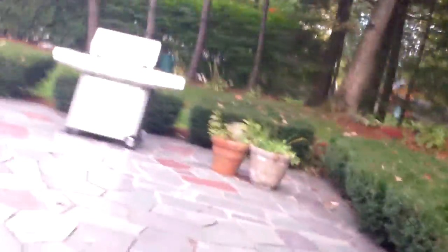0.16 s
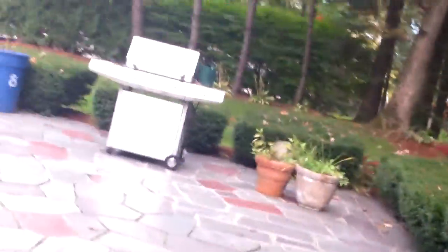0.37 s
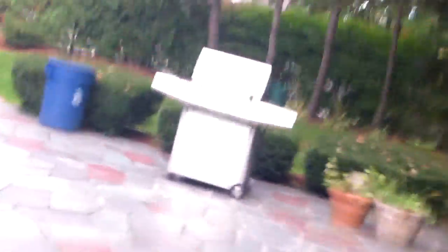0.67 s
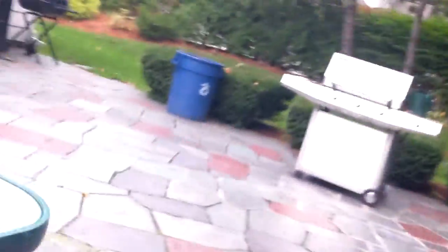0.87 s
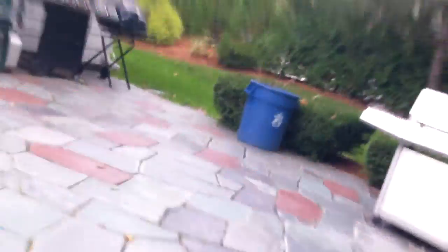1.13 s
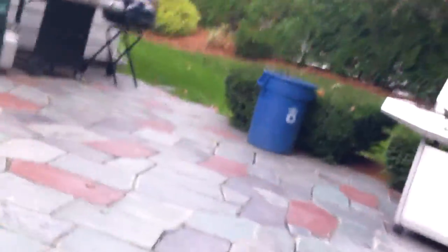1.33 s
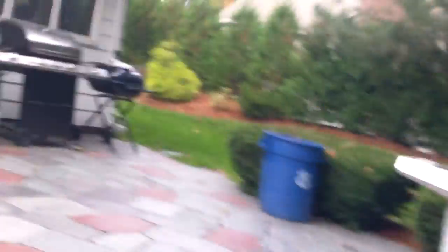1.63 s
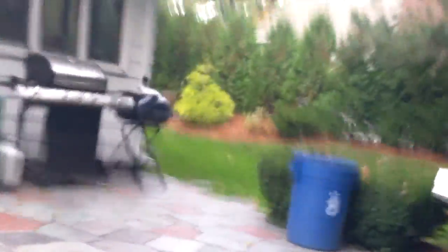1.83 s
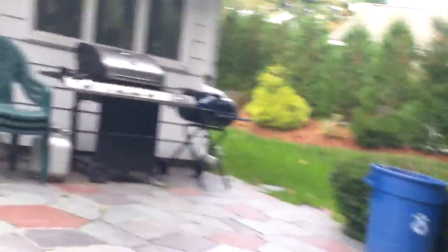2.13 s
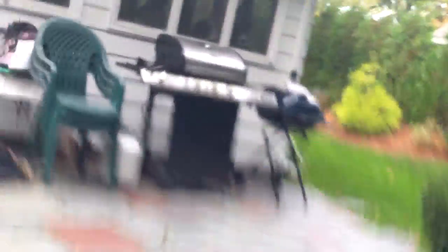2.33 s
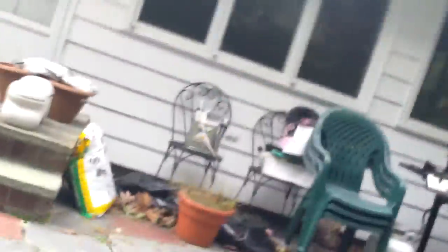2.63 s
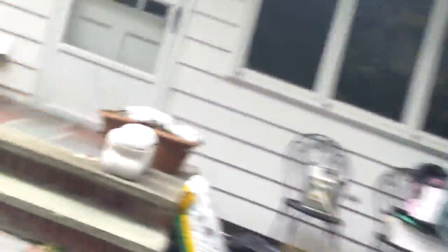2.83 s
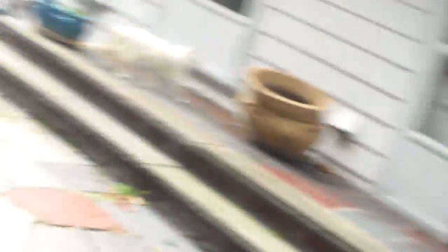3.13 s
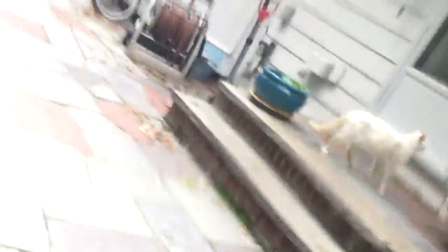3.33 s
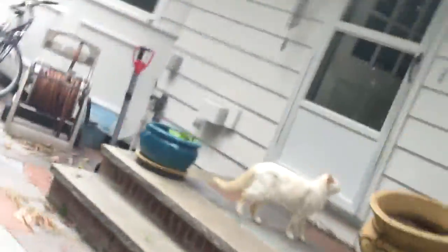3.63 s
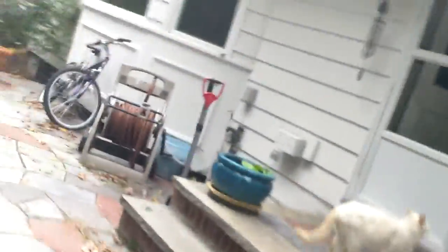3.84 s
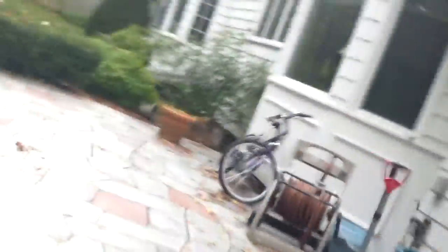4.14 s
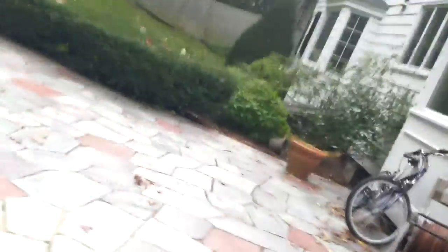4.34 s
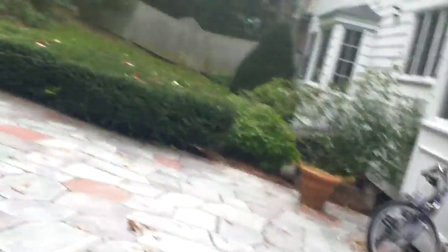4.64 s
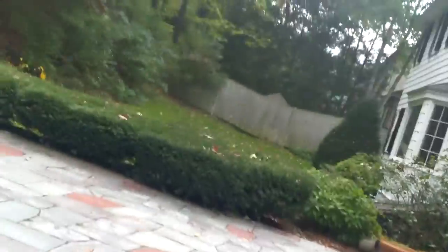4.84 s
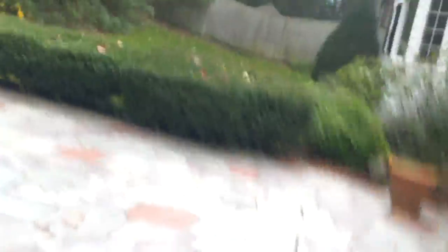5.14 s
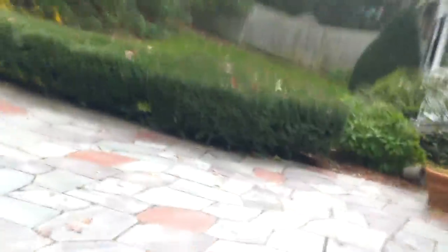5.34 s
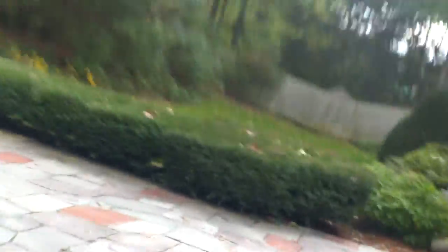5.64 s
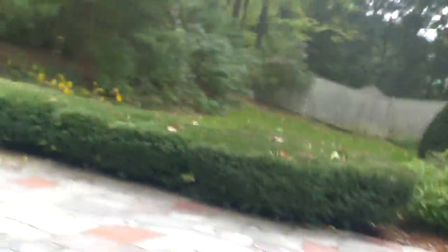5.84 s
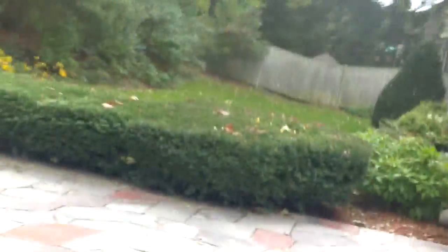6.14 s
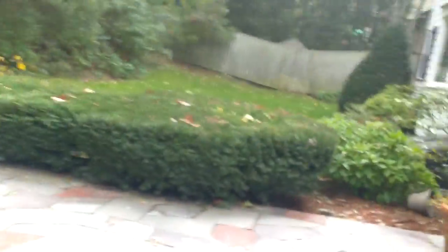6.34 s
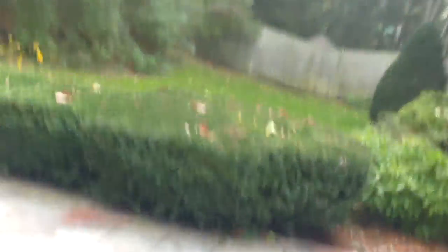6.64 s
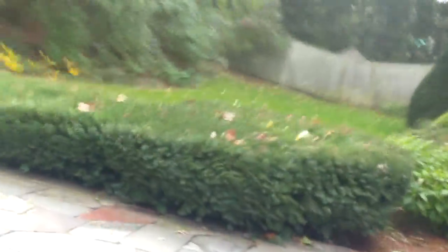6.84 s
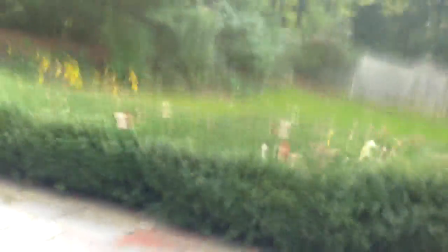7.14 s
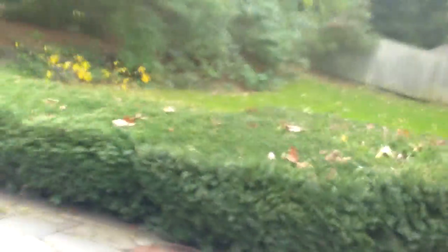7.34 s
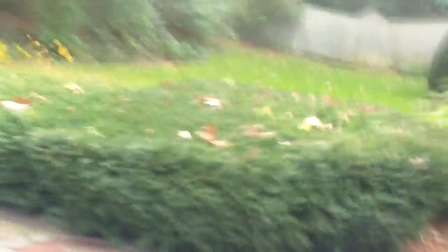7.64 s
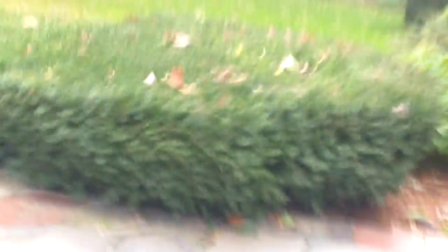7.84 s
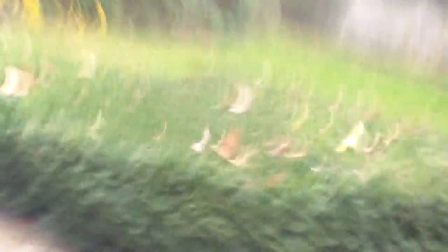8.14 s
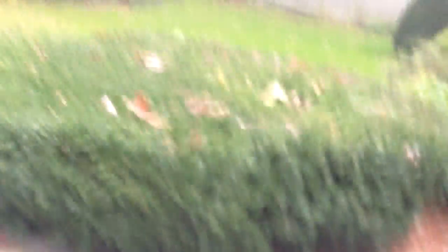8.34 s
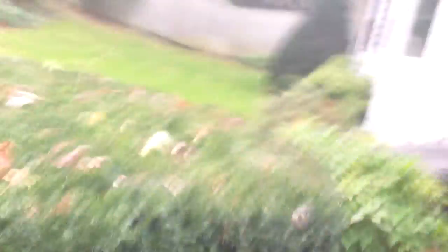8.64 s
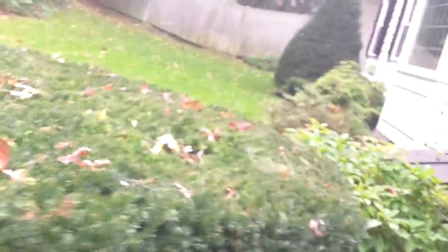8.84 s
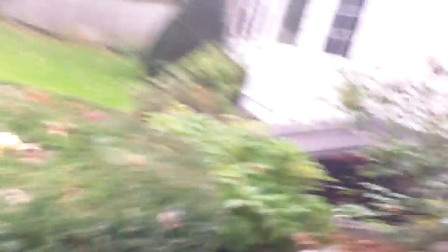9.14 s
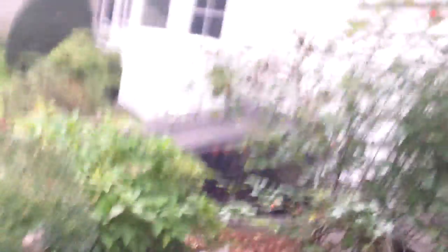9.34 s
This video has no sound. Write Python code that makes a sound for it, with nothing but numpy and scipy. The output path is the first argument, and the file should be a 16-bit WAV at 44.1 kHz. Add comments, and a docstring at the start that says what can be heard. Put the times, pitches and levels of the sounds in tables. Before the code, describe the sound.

A scooter rolls over rough flagstones on a back yard patio. Lumpy deep rumble runs throughout, with dozens of irregular hollow knocks, faint loose-part chatter and a soft whirr. The deck slams heavily several times, mostly in the first two and a half seconds and again past seven. Near the end comes a small metal clink and faint scraping swishes. The small microphone shakes with the frame, flattening, snapping and crackling over light hiss.

```python
"""Scooter on uneven flagstones

A scooter rolls over rough slabs, heard through a small microphone that shakes with the frame.
Stone grain and slab joints hit the hard wheels: random taps and blows ring the frame and loose parts.
Deep filtered noise makes the heaving bass; slams, clear notes, a metal clink and swishes join in.
The shaking drives the microphone into overload, so it flattens, snaps and crackles, over a steady hiss."""
import sys
import numpy as np
from scipy import signal
from scipy.fft import rfft, irfft, next_fast_len
from scipy.io import wavfile

SR = 44100
rng = np.random.default_rng(int(sys.argv[2]) if len(sys.argv) > 2 else 0)


def dump(signal):
    """Clip the signal to [-1, 1] and save it as 16-bit WAV at the path in sys.argv[1]."""
    limited = np.clip(np.atleast_2d(signal).T, -1, 1)
    pcm = np.round(limited * 32767).astype(np.int16)
    wavfile.write(sys.argv[1], SR, pcm)


N = 418509

# Wheels hitting slab joints: t/s, strength of the blow on the frame level/dB, on the loose parts level/dB
JOINT_KNOCKS = [(0.016, -16.5, -35.5), (0.153, -12.5, -37), (0.236, -24, -34.5), (0.296, -23, -41.5),
                (0.391, -16, -41), (0.407, -10.5, -35), (0.469, -23, -36), (0.789, -14.5, -39),
                (0.903, -15.5, -41), (0.91, -10.5, -35), (1.109, -19, -46), (1.253, -18.5, -35.5),
                (1.278, -20.5, -39), (1.355, -16, -39), (1.489, -14.5, -49), (1.513, -14, -42),
                (1.543, -16.5, -41), (1.594, -18, -42), (1.631, -21, -37.5), (1.946, -20.5, -42),
                (1.961, -19.5, -35.5), (2.018, -23, -48), (2.049, -20.5, -39), (2.062, -14.5, -35),
                (2.248, -20, -47), (2.284, -13, -31.5), (2.401, -24, -37), (2.513, -23.5, -38),
                (2.582, -16, -43), (2.698, -31.5, -41), (2.729, -20.5, -40), (2.806, -21.5, -37),
                (2.966, -15.5, -37), (2.975, -22.5, -40), (3.188, -18, -56), (3.514, -22, -35.5),
                (3.548, -19.5, -39), (3.591, -18, -42), (3.84, -24.5, -41.5), (4.021, -20.5, -47),
                (4.081, -21.5, -43), (4.168, -19, -39), (4.377, -23, -43), (4.429, -24.5, -37.5),
                (4.453, -34.5, -51), (4.479, -25, -37.5), (4.547, -19.5, -37), (4.564, -16.5, -38),
                (5.011, -18, -35), (5.138, -21, -48), (5.34, -22, -43.5), (5.384, -23, -50),
                (5.516, -16, -33.5), (5.562, -26, -43), (5.579, -20.5, -35), (5.663, -23, -39),
                (5.775, -24.5, -38), (6.01, -22, -39), (6.182, -20.5, -48), (6.215, -20, -37.5),
                (6.235, -20, -47), (6.269, -25, -41), (6.47, -19.5, -43), (6.488, -16.5, -39),
                (6.604, -18, -38), (6.638, -19.5, -39.5), (6.767, -20.5, -35.5), (6.856, -22, -41),
                (6.919, -19, -40.5), (7.004, -21, -42), (7.062, -18.5, -36.5), (7.323, -10.5, -33.5),
                (7.545, -22.5, -41.5), (7.602, -19.5, -44), (7.617, -19, -36.5), (7.852, -32, -38.5),
                (8.173, -17.5, -45), (8.205, -17.5, -40), (8.4002, -16, -53), (8.474, -20, -43),
                (8.538, -23.5, -45.5), (8.614, -20, -48), (8.627, -19.5, -42), (8.715, -18.5, -35),
                (8.75, -18.5, -42), (8.786, -20, -42), (8.841, -16, -40), (9.21, -23, -44),
                (9.425, -19, -41)]
# Resonances of deck and stem: f/Hz, width f/Hz, relative level/dB
FRAME_MODES = [(292.2, 54, 2.5), (378.9, 61, 4), (472, 67.2, -2), (790, 80, -6), (1068, 197, -8),
               (1112, 52.4, -4), (1296, 42, -17.5)]
# Resonances of the loose parts: f/Hz, width f/Hz, relative level/dB
LOOSE_MODES = [(1700, 1050, 6.5), (1930, 200, 10.5), (2692, 230, 3), (3515, 470, 8), (3850, 360, 10.5),
               (4180, 324, 9.5), (4440, 365, 7.5), (5080, 440, 3.5), (5230, 430, 1), (6590, 100, -3.5),
               (7310, 180, -1)]
# Colour of the bouncing bass: f/Hz, relative level per Hz/dB
HEAVE_COLOUR = [(2.4, -20.5), (4.0, -4.5), (48, 0.5), (118, -4), (154, -4), (238, -14), (260, -20.5),
                (340, -28), (570, -120)]
# Notes of the small metal part: f/Hz, starting level/dB, time to fall 60 dB t/s
CLINK_MODES = [(4480, -8, 0.013), (4250, -17, 0.013), (4770, -19, .013), (4400, -36, .12), (4590, -35, .11),
               (2700, -43, .13), (7420, -35, 0.025), (900, -18, .015), (1450, -19, .012)]
# The small metal part is touched several times: time from the main tap t/s, relative level/dB
CLINK_TOUCHES = [(-.002, -17), (0, 0), (.0056, -9), (.024, -21)]
# Roughness of the paving along the ride: t/s, level against average/dB
PAVING_ROUGHNESS = [(0, 0), (1, -0.5), (2, -0.5), (3, 1.5), (4, -1), (5, 1), (5.7, 2), (6.298, -2),
                    (7, 1.5), (7.8, 1), (8.4, -2), (9.001, -7.5), (9.49, 0)]
# A wheel hops off the stone: start t/s, time in the air t/s, depth of the dip level/dB
WHEEL_HOPS = [(0.5, 0.05, 10.5), (0.818, 0.012, 6.5), (0.951, 0.12, 4), (1.301, 0.014, 5),
              (1.391, 0.078, 4), (2.089, 0.06, 6), (2.333, 0.049, 5), (2.839, 0.076, 8),
              (4.641, 0.038, 3.5), (5.074, 0.1, 7), (5.417, 0.021, 6), (5.971, 0.075, 5.5),
              (7.091, 0.052, 9), (7.276, 0.02, 9), (7.376, 0.077, 7), (7.69, 0.05, 5), (7.924, 0.098, 13),
              (8.249, 0.086, 5), (8.655, 0.0087, 11), (8.885, 0.078, 6.5)]
# Smooth scraping swells: peak t/s, level/dB, rise t/s, fall t/s
SCRAPE_SWISHES = [(8.165, -54, 0.04, 0.03), (9.161, -54.5, 0.2, 0.023), (9.36, -58, 0.15, 0.4)]
# The deck slams down at the worst joints: t/s, starting level/dB
DECK_SLAMS = [(0.413, -11.5), (0.907, -4.5), (1.247, -10), (2.058, -1.5), (2.282, -1.5), (7.335, -5.5),
              (8.54, -8.5), (9.184, -10.5)]
# Single notes of the frame left ringing: t/s, f/Hz, starting level before the build-up/dB
FRAME_RINGS = [(0.912, 1095, -14), (3.84, 820, -17), (5.385, 346, -20), (6.042, 340, -20),
               (6.236, 805, -24.5), (6.487, 798, -17), (7.056, 803, -18.5), (7.615, 802, -15),
               (8.168, 333, -13.5), (8.612, 766, -16.5)]

# Base levels on average paving, and how much of the paving's dB swing each layer follows
HEAVE_DB, ROLL_DB, RATTLE_DB = -20.5, -35, -55
HEAVE_FOLLOWS, RATTLE_FOLLOWS = 1, 1
WHIRR_FOLLOWS = 0.45  # share of the rattle's swing: the bearings spin on while a wheel is in the air
WHIRR_DB, TICKS_DB = -8, -1  # against the rattle level
GRAINS_PER_S, RATTLES_PER_S = 800, 1700
TYRE_HZ, LOOSE_TOP_HZ = 1309, 6370  # contacts are not sharp enough to drive much above these
THUD_FROM_DB = -22  # knock strengths count against this when they swell the heave
FIRST_BLOW_DB, FIRST_TICK_DB = 16, 15  # opening blow and tick, over the knock's own strength
LIFT_S, LAND_S = 0.007, 0.017  # a wheel leaving and meeting the stone
SLAM_HZ, SLAM_T60_S = 104, 0.074
RING_CYCLES, RING_RISE_S = 40, 0.002  # cycles to fall 60 dB; build-up time constant
CLINK_S = 8.401  # main tap
CRACK_DB, CRACK_T60_S = -23, 0.042  # rough edge of the clink

SHAKE_TOP_HZ = 2500  # only the shaking below this overloads the microphone
TOP, BOTTOM = .225, .18  # overload levels for upward and downward swings
BREAK_THROUGH, BREAK_MOST = 2.0, .17  # multiple of overload where jolts break through; most they add
# Share of overload that sets off a jump, smallest jump in dB, time constant in s
SNAP_FROM, SNAP_DB, SNAP_S = .78, -43.5, 0.00013
HISS_DB, CRACKLE_DB = -68.5, -50.5  # steady noise; most noise added by overload
CUTOFF_HZ = 15830


def amp(db):
    """Turn dB into a plain multiplier."""
    return 10 ** (np.asarray(db) / 20)


def rms_one(x):
    """Scale to an average strength (rms) of 1."""
    return x / np.sqrt(np.mean(x ** 2) + 1e-20)


def drift(rate):
    """Smooth noise into a slow random wander with spread 1; rate in Hz."""
    r = np.exp(-2 * np.pi * rate / SR)
    wander = signal.lfilter([1], [1, -2 * r, r * r], rng.standard_normal(N + SR))
    return rms_one(wander[SR:])  # skip the settling second


def grains(per_s, spread_db):
    """Random single taps, many small and a few large."""
    sizes = amp(spread_db * np.minimum(rng.exponential(1, N), 4)) * rng.choice([-1, 1], N)
    return sizes * (rng.random(N) < per_s / SR)


def bursts(level_db, t60, rise=0.0018):
    """An envelope that jumps up at every knock and dies away; t60 and rise in s."""
    jumps = np.zeros(N)
    knock_s = np.array(JOINT_KNOCKS)[:, 0]
    jumps[(knock_s * SR).astype(int)] = amp(level_db)
    dying = signal.lfilter([1], [1, -amp(-60 / (t60 * SR))], jumps + 1e-18)
    smooth = np.exp(-1 / (rise * SR))
    return signal.lfilter([1 - smooth], [1, -smooth], dying)


def resonate(force, modes, scatter_db, top_hz):
    """Ring side-by-side resonances of alternating sign, at unit gain for dense force, softened on top."""
    soft = signal.butter(3, top_hz, fs=SR, output="sos")
    out, unit = np.zeros(N), np.zeros(8192)
    for k, (hz, width_hz, level_db) in enumerate(modes):
        r = np.exp(-np.pi * width_hz / SR)
        b = (-1) ** k * amp(level_db) * (1 - r * r) * np.array([1, 0, -1])
        a = [1, -2 * r * np.cos(2 * np.pi * hz / SR), r * r]
        # each mode's share of the force changes every 200 samples
        share = np.repeat(amp(scatter_db * rng.standard_normal(N // 200 + 1)), 200)[:N]
        out += signal.lfilter(b, a, force * share + 1e-18)
        unit += signal.lfilter(b, a, signal.unit_impulse(len(unit)))
    return signal.sosfilt(soft, out) / np.linalg.norm(signal.sosfilt(soft, unit))


def heave(level_db, bumpy):
    """Deck and rider bounce: deep noise and single shoves that come in lumps and thud at the joints."""
    size = next_fast_len(N)
    hz = np.arange(1, size // 2 + 2) * SR / size
    table = np.array(HEAVE_COLOUR)
    shape = amp(np.interp(np.log(hz), np.log(table[:, 0]), table[:, 1]))
    thuds = bursts(np.array(JOINT_KNOCKS)[:, 1] - THUD_FROM_DB, t60=0.11, rise=0.005)
    lumps = amp(3.1 * bumpy) + thuds
    force = rng.standard_normal(N) + 1.7 * rms_one(grains(90, 2.2))
    deep = irfft(rfft(force * lumps, size) * shape, size)[:N]
    return amp(level_db) * rms_one(deep)


def frame(roll_db, bumpy, grit):
    """Stone grain hums in the frame's resonances; each joint adds a quick volley of blows."""
    shaking = amp(roll_db + 2.4 * bumpy) * grit
    s, blow_db, _ = np.transpose(JOINT_KNOCKS)
    blows = bursts(blow_db, t60=0.018, rise=0.00041) * rms_one(grains(8000, 3.5))
    blows[(s * SR).astype(int)] += amp(blow_db + FIRST_BLOW_DB)
    return resonate(shaking + blows, FRAME_MODES, scatter_db=2.5, top_hz=TYRE_HZ)


def slams():
    """Each slam swings the deck at one low pitch and dies within a few cycles."""
    table = np.array(DECK_SLAMS)
    t = np.maximum(np.arange(N) / SR - table[:, :1], 0)
    fading = amp(table[:, 1:] - 60 * t / SLAM_T60_S)
    return (fading * np.sin(2 * np.pi * SLAM_HZ * t)).sum(axis=0)


def rings():
    """Hollow frame notes that build in a few ms and die over a set number of cycles."""
    s, hz, start_db = np.transpose(FRAME_RINGS)[:, :, None]
    t = np.maximum(np.arange(N) / SR - s, 0)
    fading = amp(start_db - 60 * t * hz / RING_CYCLES)
    building = 1 - np.exp(-t / RING_RISE_S)
    return (fading * building * np.sin(2 * np.pi * hz * t)).sum(axis=0)


def loose_parts(rattle_db, bumpy, grit):
    """Clamp, bearings and brake chatter in clusters and jolt at the joints, over a smooth whirr."""
    clusters = amp(1.6 * bumpy + 7 * np.tanh(drift(63)))
    ticks = clusters * (grit + rms_one(grains(RATTLES_PER_S, 11.0)))
    s, _, jolt_db = np.transpose(JOINT_KNOCKS)
    jolts = bursts(jolt_db, t60=0.029) * rms_one(grains(5000, 4.1))
    jolts[(s * SR).astype(int)] += amp(jolt_db + FIRST_TICK_DB)
    chatter = amp(rattle_db + TICKS_DB) * rms_one(ticks) + jolts
    whirr_db = RATTLE_DB + WHIRR_DB + WHIRR_FOLLOWS * (rattle_db - RATTLE_DB)
    whirr = amp(whirr_db) * rng.standard_normal(N)
    # the whirr is too soft for the two top modes
    return (resonate(chatter, LOOSE_MODES, scatter_db=1.0, top_hz=LOOSE_TOP_HZ)
            + resonate(whirr, LOOSE_MODES[:-2], scatter_db=3.0, top_hz=LOOSE_TOP_HZ))


def clink():
    """A light touch, the main tap and two weaker touches ring a small metal part, each with a noise crack."""
    band = signal.butter(4, [600, 4900], "band", fs=SR, output="sos")
    noise = rms_one(signal.sosfilt(band, rng.standard_normal(N)))
    out = 0
    for delay, level_db in CLINK_TOUCHES:
        t = np.maximum(np.arange(N) / SR - CLINK_S - delay, 0)
        notes = sum(amp(start_db - 60 * t / t60) * np.sin(2 * np.pi * hz * t)
                    for hz, start_db, t60 in CLINK_MODES)
        crack = amp(CRACK_DB - 60 * t / CRACK_T60_S) * noise
        onset = (1 - np.exp(-t / .001)) ** 2
        out = out + amp(level_db) * (notes + crack) * onset
    return out


def swish():
    """Even noise swells, partly in the colour of the loose parts, with a faint airy top."""
    noise, airy = rng.standard_normal((2, N))
    t = np.arange(N) / SR
    swell = sum(amp(db) * np.exp(-.5 * ((t - s) / np.where(t < s, rise, fall)) ** 2)
                for s, db, rise, fall in SCRAPE_SWISHES)
    band = signal.butter(2, [1500, 5000], "band", fs=SR, output="sos")
    broad = rms_one(signal.sosfilt(band, airy))
    coloured = resonate(noise, LOOSE_MODES, scatter_db=3.0, top_hz=LOOSE_TOP_HZ)
    return swell * (coloured + amp(-9.0) * broad + amp(-14) * noise)


def contact():
    """Change of level in dB, dipping while a wheel is off the ground."""
    t = np.arange(N) / SR
    return -sum(np.interp(t, s + np.cumsum([-LIFT_S, LIFT_S, air, LAND_S]), [0, depth_db, depth_db, 0])
                for s, air, depth_db in WHEEL_HOPS)


def scene():
    """Add up all the vibration that reaches the microphone."""
    swing_db = np.interp(np.arange(N) / SR, *np.transpose(PAVING_ROUGHNESS)) + contact()
    bumpy = drift(21.0)  # rough and smooth patches of stone shake heave, frame and loose parts together
    grit = rms_one(grains(GRAINS_PER_S, 2.76))  # small bumps under the wheels
    ride = heave(HEAVE_DB + HEAVE_FOLLOWS * swing_db, bumpy)
    ride = ride + frame(ROLL_DB + swing_db, bumpy, grit) + slams() + rings()
    rattle = loose_parts(RATTLE_DB + RATTLE_FOLLOWS * swing_db, bumpy, grit)
    return (ride + rattle + clink() + swish())[None]


def record(dry):
    """The microphone flattens lopsidedly, snaps and crackles near overload, hisses and loses its top."""
    low_pass = signal.butter(2, SHAKE_TOP_HZ, fs=SR, output="sos")
    shake = signal.sosfiltfilt(low_pass, dry)
    load = np.abs(shake) / np.where(shake > 0, TOP, BOTTOM)  # 1 = overload
    flattened = shake / (1 + load ** 8) ** .125
    # the hardest jolts break through the flattening
    through = BREAK_MOST * np.tanh(np.maximum(load - BREAK_THROUGH, 0))
    out = dry - shake + flattened + np.sign(shake) * through
    # the signal makes a small jump each time it nears overload
    nearing = np.diff((load > SNAP_FROM) * 1., prepend=0) > 0
    sizes = amp(SNAP_DB + 4.02 * np.minimum(rng.exponential(1, dry.shape), 4))
    jumps = nearing * np.sign(shake) * sizes
    out = out + signal.lfilter([1], [1, -np.exp(-1 / (SNAP_S * SR))], jumps + 1e-18)
    noise_level = amp(HISS_DB) + amp(CRACKLE_DB) * np.tanh(np.maximum(load - 1, 0))
    out = out + noise_level * rng.standard_normal(dry.shape)
    return signal.sosfilt(signal.ellip(12, .5, 60, CUTOFF_HZ, fs=SR, output="sos"), out)


dry = scene()
out = record(dry)
dump(out)
```